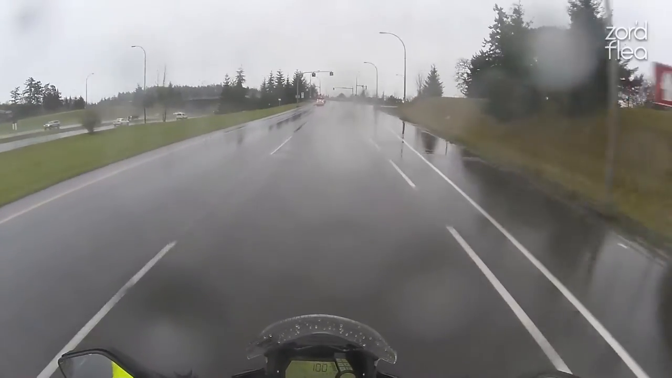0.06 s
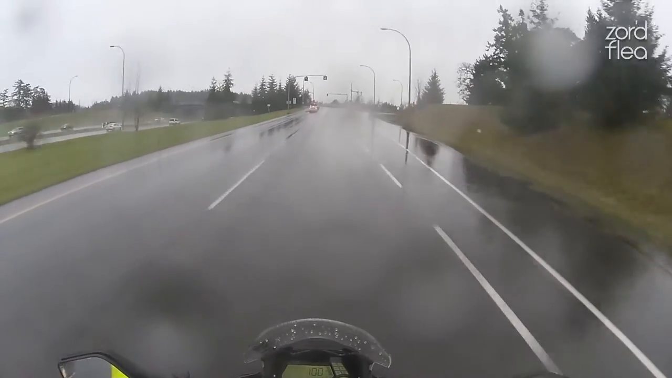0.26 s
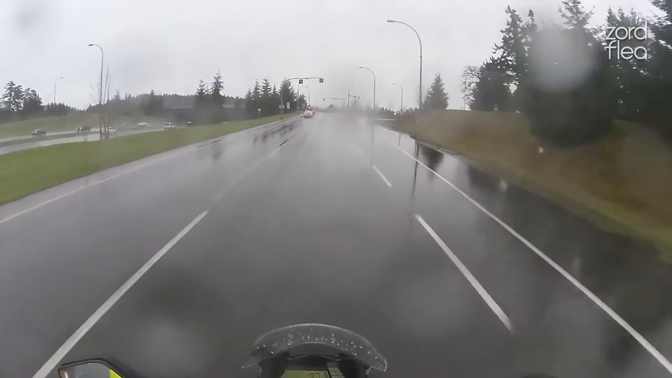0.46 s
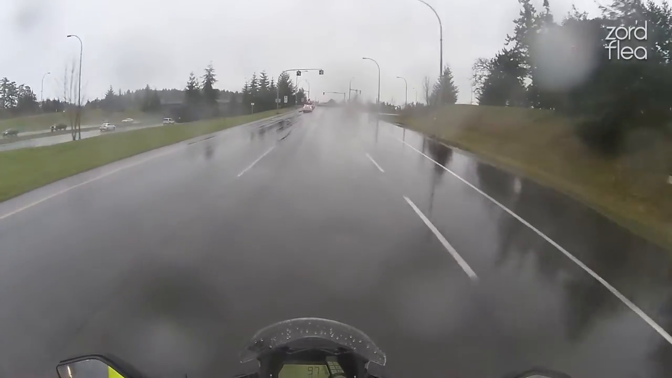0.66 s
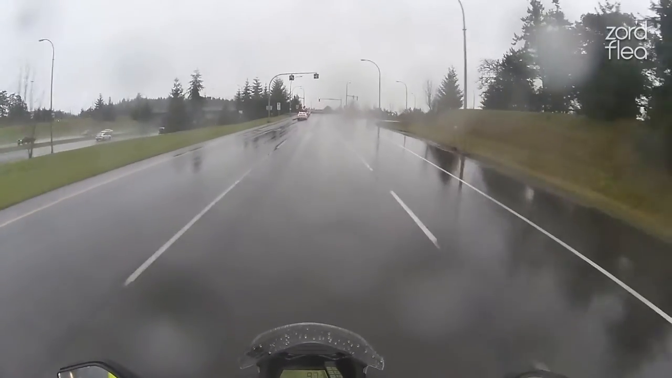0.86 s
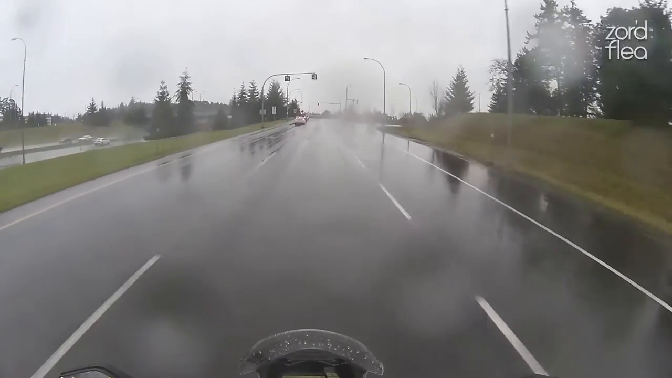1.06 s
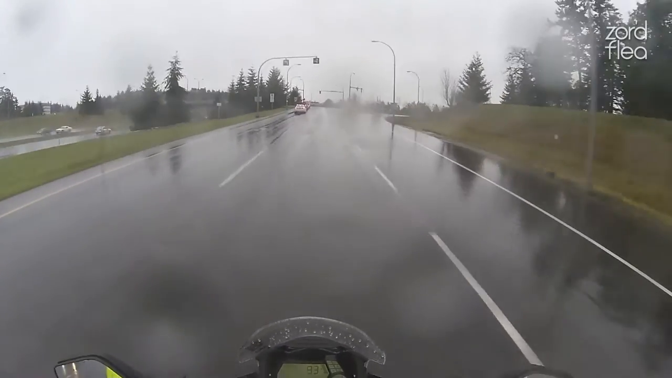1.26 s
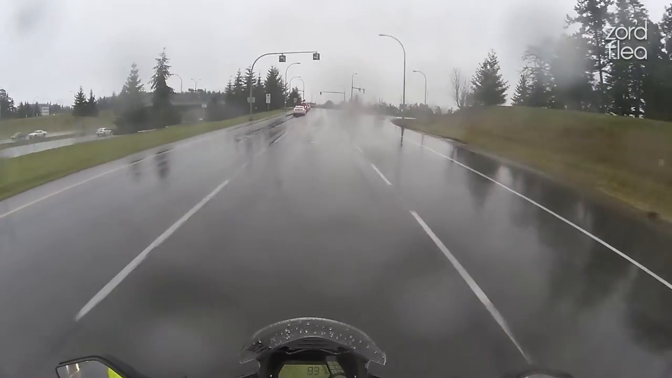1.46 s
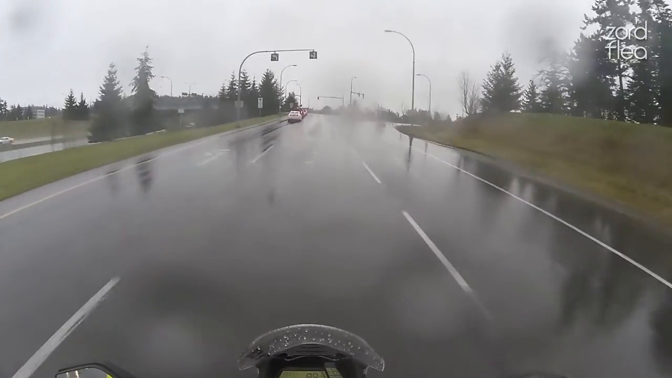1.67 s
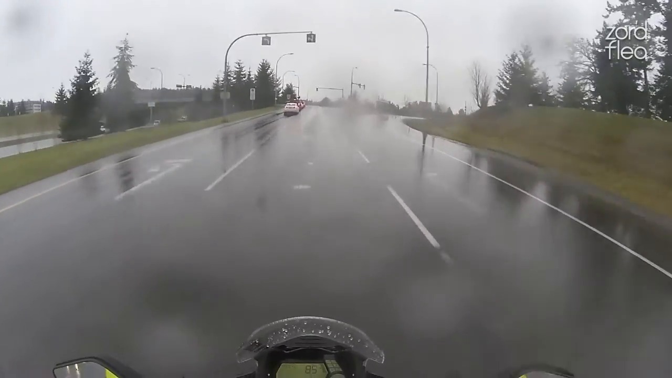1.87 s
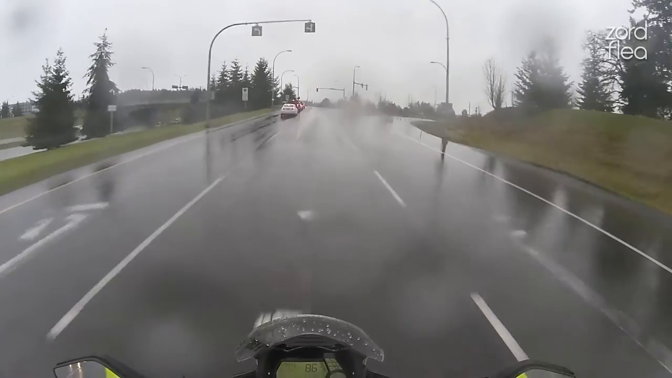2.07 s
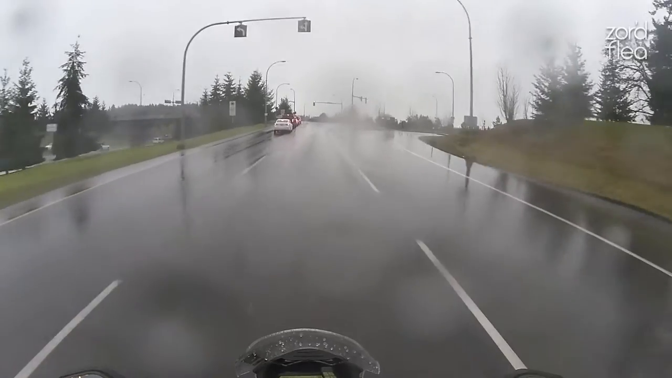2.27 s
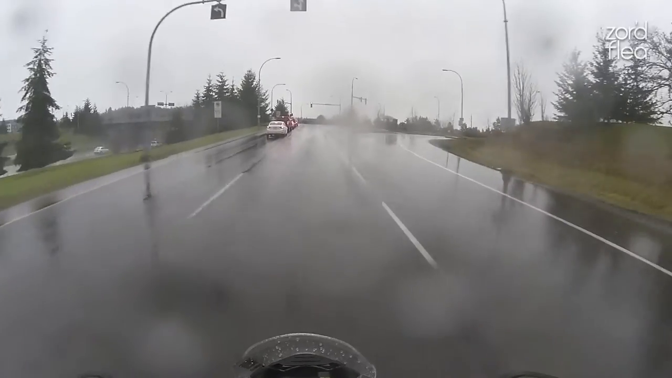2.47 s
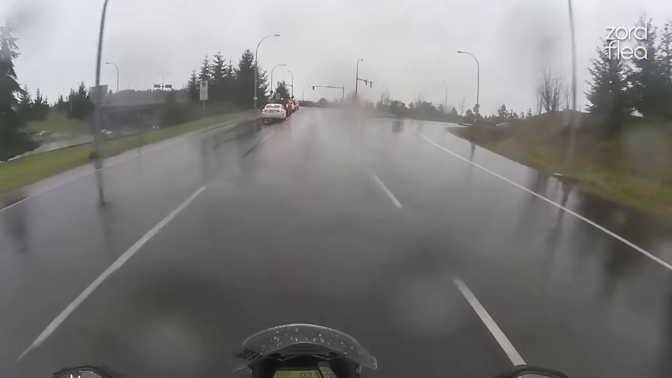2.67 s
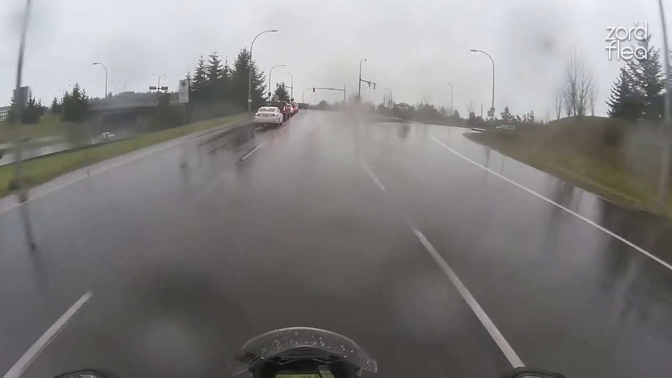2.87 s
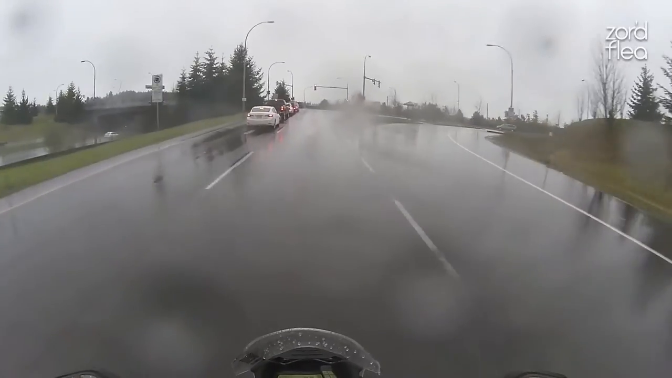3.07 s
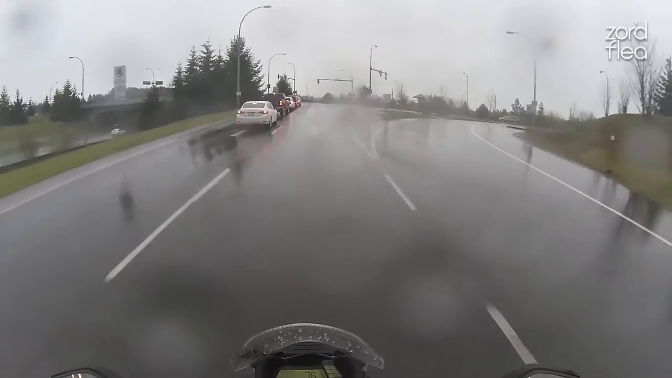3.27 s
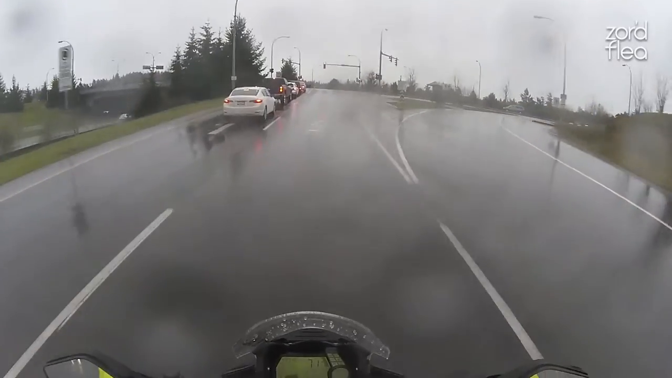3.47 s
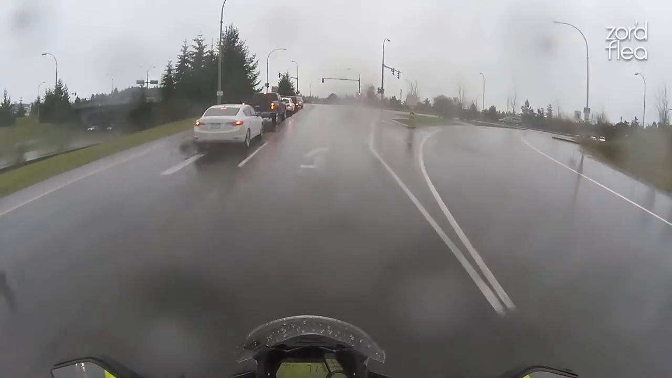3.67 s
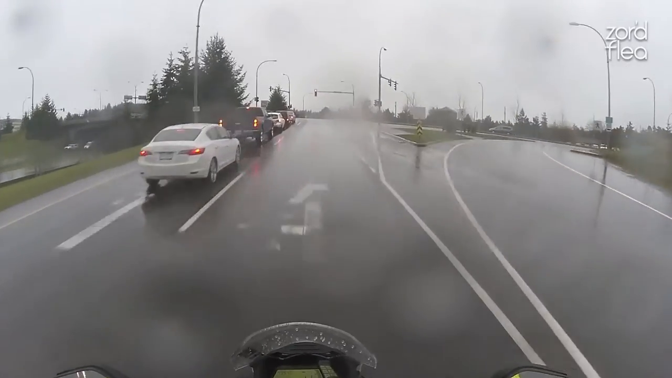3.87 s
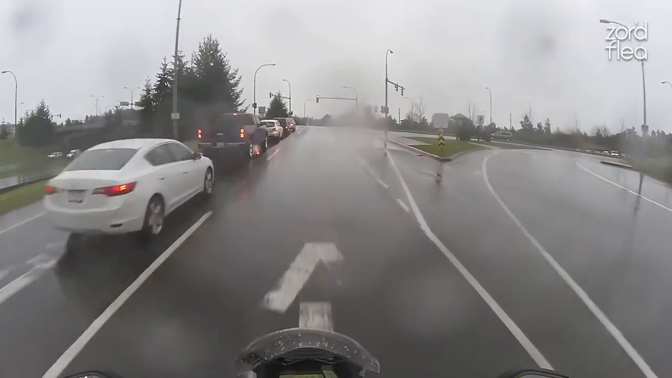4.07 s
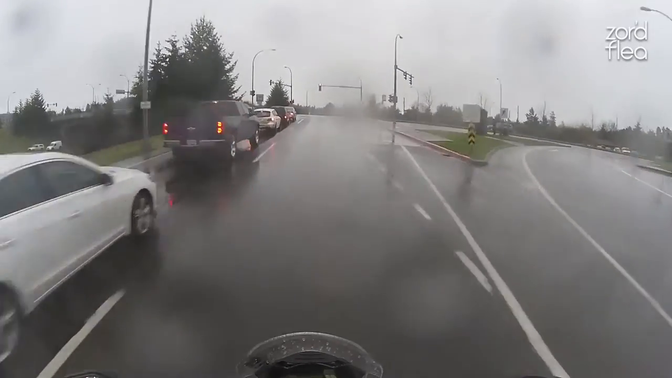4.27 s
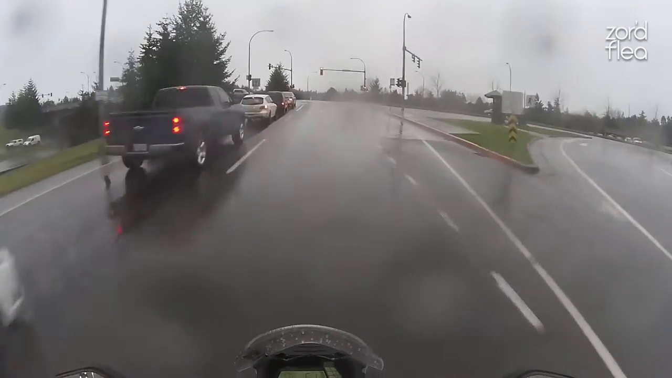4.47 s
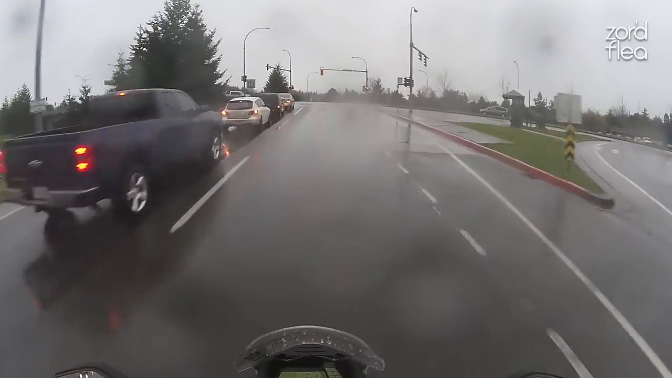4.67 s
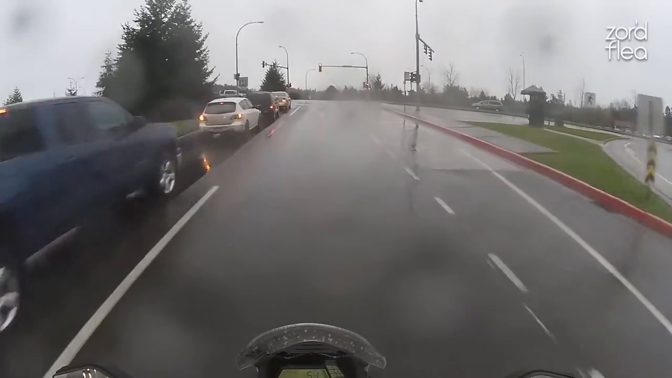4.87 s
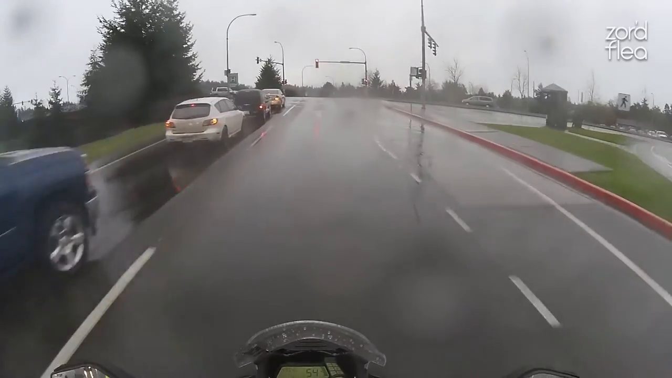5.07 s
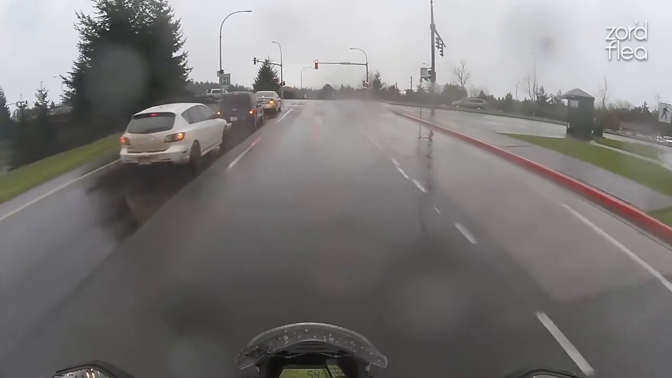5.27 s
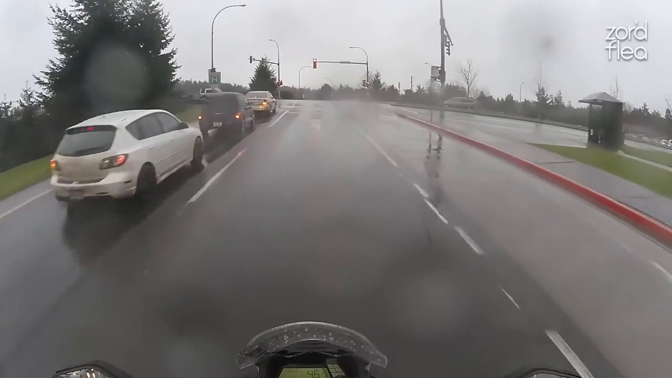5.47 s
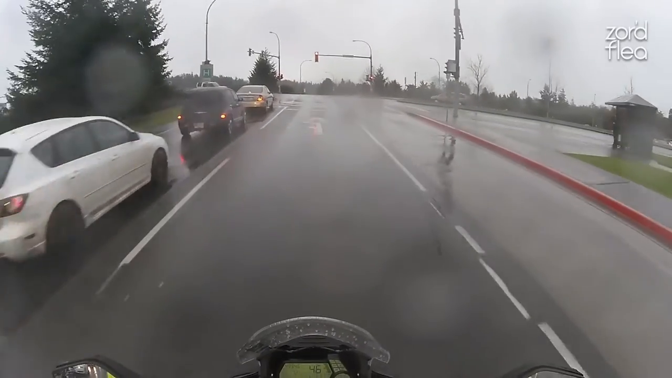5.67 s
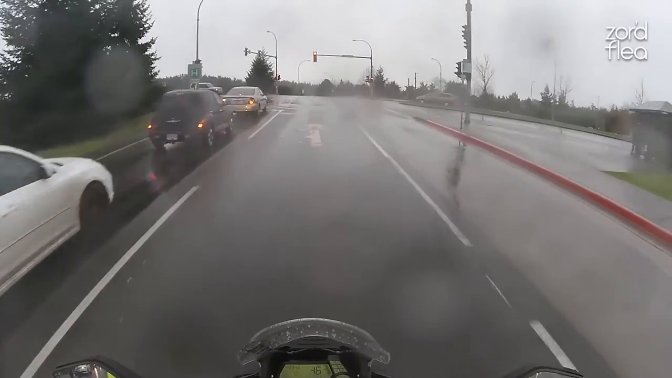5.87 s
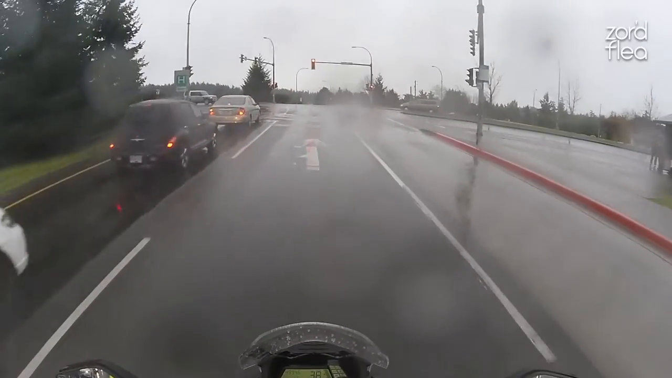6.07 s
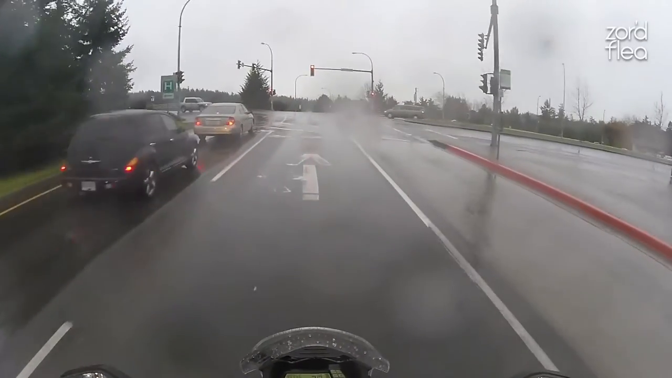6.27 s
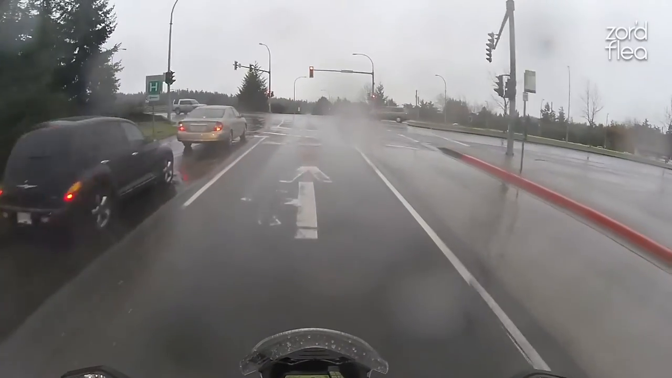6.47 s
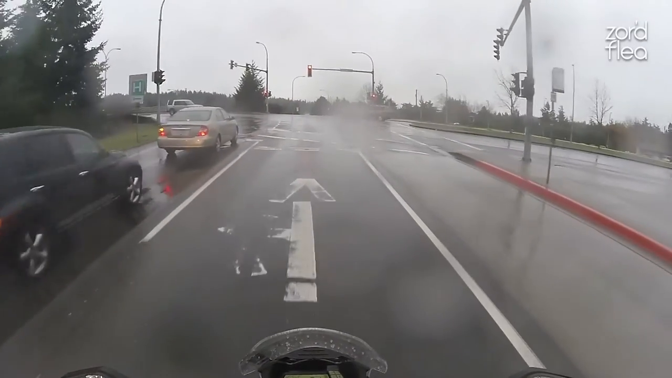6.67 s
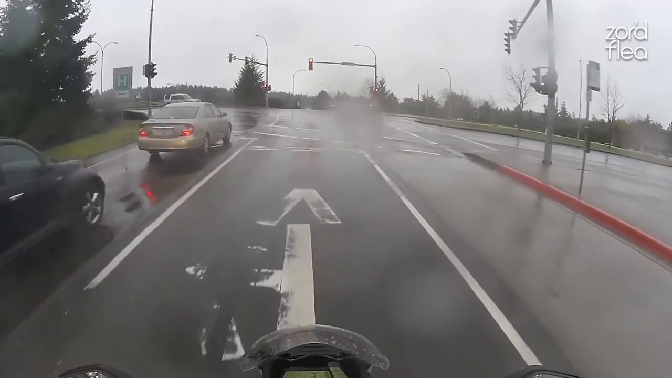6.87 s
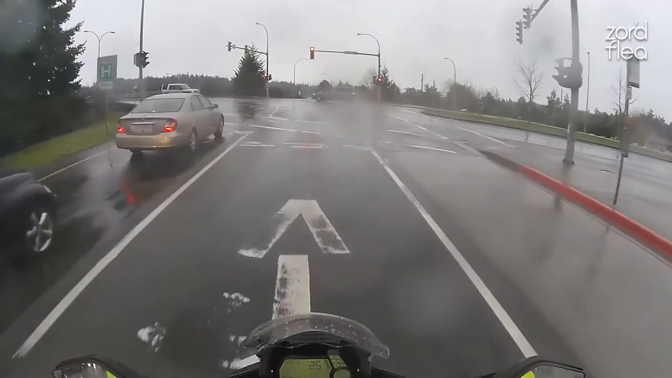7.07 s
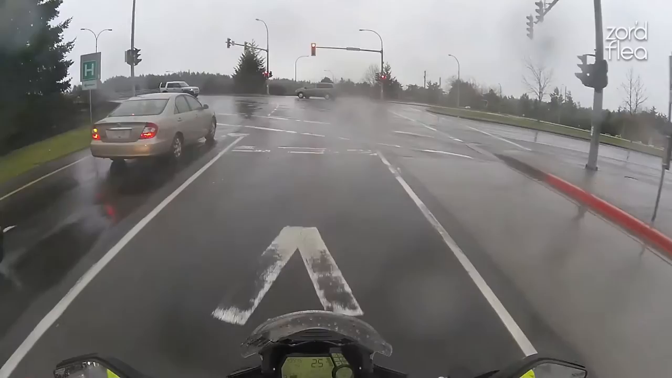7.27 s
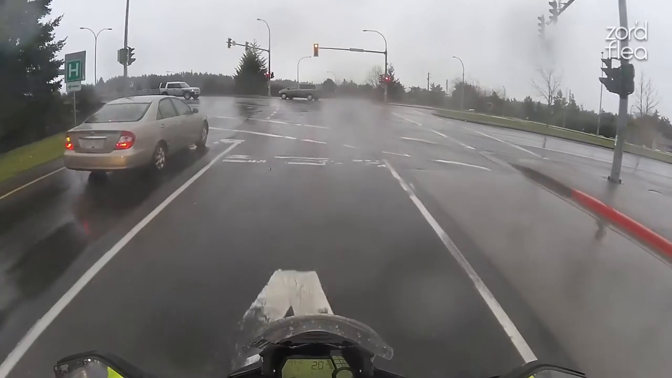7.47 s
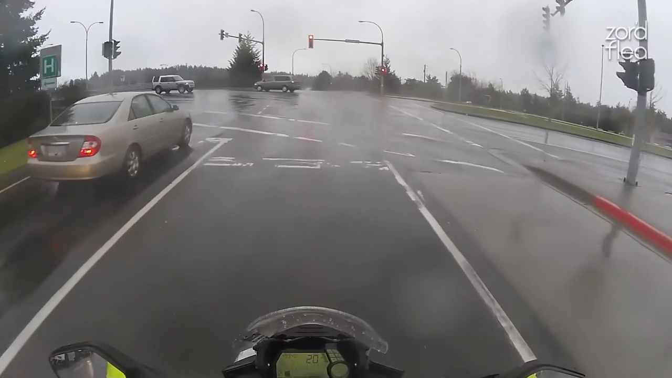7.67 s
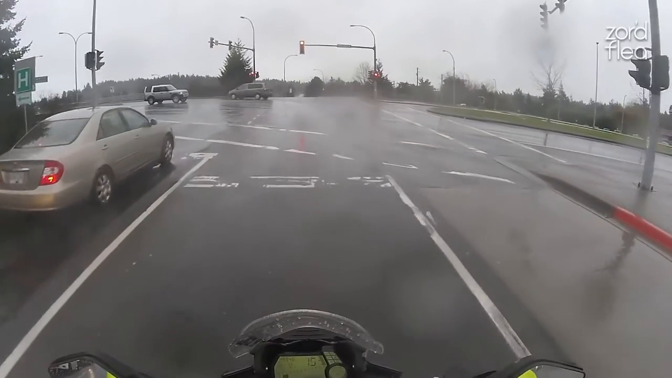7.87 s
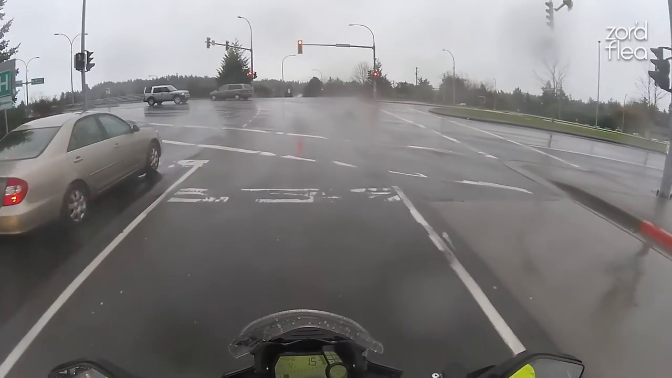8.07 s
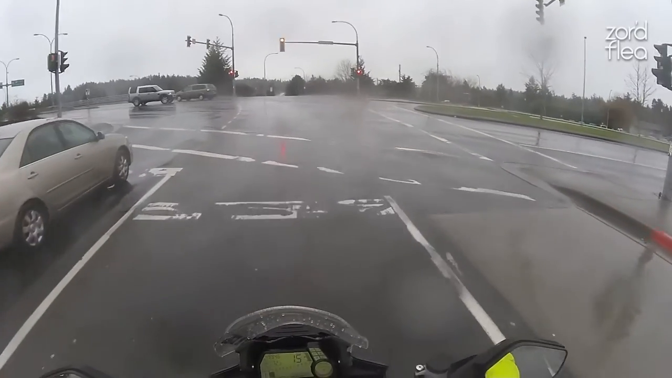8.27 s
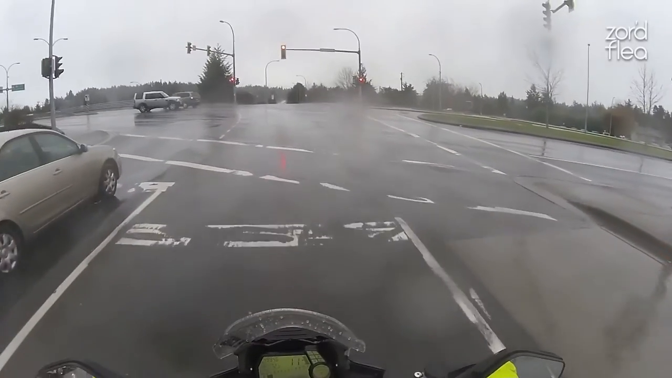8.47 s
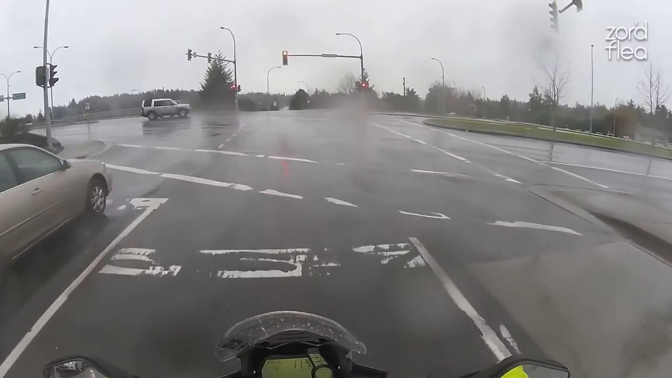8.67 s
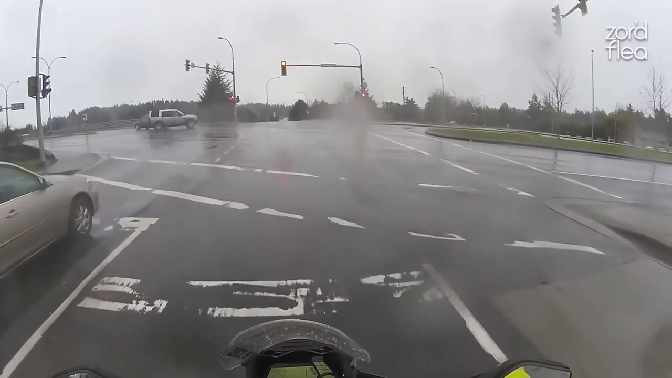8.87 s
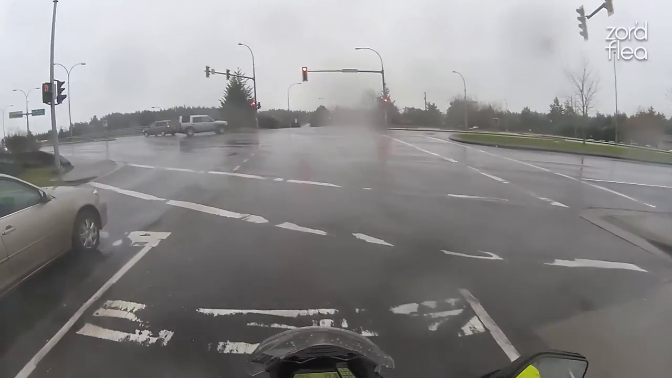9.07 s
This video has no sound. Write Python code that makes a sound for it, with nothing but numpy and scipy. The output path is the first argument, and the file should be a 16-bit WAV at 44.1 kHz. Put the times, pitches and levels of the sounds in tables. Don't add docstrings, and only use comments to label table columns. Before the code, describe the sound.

A motorcycle decelerates from highway speed in rain. Muffled wind roar and gust slaps dominate at first, over watery tyre hiss, drops tapping and gear whine. Light brake hiss and a brief rise of revs follow, then a falling engine drone. Once the clutch is pulled, lumpy exhaust pulses and metallic ticking come forward, then a gear clunk and slow idle, with a faint high electronic whistle close at the microphone.

```python
import sys
import numpy as np
from scipy import signal
from scipy.io import wavfile
from scipy.ndimage import uniform_filter1d

SR = 44100
rng = np.random.default_rng(int(sys.argv[2]) if len(sys.argv) > 2 else 0)


def unload_wav(signal):
    wavfile.write(
        sys.argv[1],
        SR,
        np.round(np.clip(np.atleast_2d(signal).T, -1, 1) * 32767).astype(np.int16),
    )


def gain_from_db(level_db):
    decades = np.asarray(level_db, float) / 20
    return 10 ** decades


N = 402191
TIME = np.arange(N) / SR

# t/s, road speed/(km/h), air speed at helmet/(km/h)
MOTION = [(0, 99, 102), (.4, 87.4, 71), (1.2, 79, 84.8), (2.2, 68, 72.7), (2.6, 61, 62.4), (3.1, 53.5, 48),
          (3.5, 63, 50.8), (4.2, 54.4, 39.3), (4.6, 47, 35.5), (5.2, 35, 26), (5.7, 27.8, 24.5),
          (6.4, 20.2, 19.2), (7.2, 8.6, 17), (9.12, 0.71, .6)]
# t/s, engine cycles/Hz
CRANK_SPEED = [(0, 33.2), (.4, 32.75), (1.0, 31.28), (2.0, 28.83), (3.05, 26), (3.5, 30), (4.0, 28.6),
               (4.4, 26.2), (5.0, 22), (6.0, 15.27), (6.2, 14.13), (6.45, 13.2), (9.2, 11.7)]

# f/Hz, density/dB
STREET_SPECTRUM = [(15, -0.5), (50, 0.5), (110, -2), (200, 13.5), (400, -1), (700, -8), (1300, -1),
                   (1720, -6.5), (1950, -14.5), (3200, -20), (5000, -29.5), (8000, -37.5), (12500, -45)]
WIND_SPECTRUM = [(18, -40), (30, -13.5), (91, 2), (140, 2), (250, -6), (640, -24), (781, -27.5), (838, -42),
                 (900, -51.5), (1170, -57.5), (1980, -120)]
RUSH_SPECTRUM = [(240, -17), (400, -3.5), (628, -7.5), (845, -6), (985, -7), (1080, -5.5), (1260, -7),
                 (1830, -16.5), (1990, -15), (2600, -25.5), (3050, -30), (3960, -45), (6710, -120)]
SPRAY_SPECTRUM = [(2000, -19), (2700, 0), (3200, -3), (4300, -4.5), (5000, -9), (6300, -14), (8000, -16),
                  (10000, -19.5), (11000, -27), (12000, -30.5), (13500, -40)]
RUMBLE_SPECTRUM = [(12, -20), (25, -6), (45, 0.5), (70, 0), (110, -22)]

# t/s, level/dB, length/s
GUSTS = [(0.27, 2, 0.037), (0.34, -4.5, 0.042), (0.45, 3.5, 0.2), (0.69, 1.5, 0.25), (0.78, 2, .05),
         (1.01, 5.5, 0.016), (1.05, -4, 0.038), (1.08, 9.5, 0.02), (1.12, -5.5, 0.081), (1.21, -1.5, 0.1),
         (1.79, 5, 0.041), (1.84, -4.5, 0.1), (1.92, 5, 0.049), (2.04, 0, 0.11), (2.21, 1, 0.12),
         (2.27, -3, 0.056), (2.41, 7.5, 0.02), (2.48, -4, 0.029), (2.95, 7.5, 0.058), (3.17, 4, 0.14),
         (3.6, -6, 0.05), (3.79, 5, 0.071), (3.83, -9, 0.066), (3.89, 3.5, 0.13), (4.05, 3.5, 0.13),
         (4.2, 4.5, 0.19), (4.5, -3, .1), (4.65, 3, 0.083), (5.3, 1.5, .1), (0.05, 1, .04),
         (0.13, -3, 0.12), (1.55, -1.5, .1)]
# t/s, peak level/dB, f/Hz
SLAPS = [(0.268, -5, 192), (0.769, 4, 166), (0.811, -30, 191), (1.443, -5.5, 161), (1.483, -1, 191),
         (2.184, -7, 151), (2.381, -24, 237), (2.631, -10, 205), (2.831, -7.5, 159), (4.062, -10.5, 244)]
# t/s, peak level/dB, f/Hz
EDDIES = [(0.174, -18, 242), (0.26, -14, 202), (0.349, -16, 275), (0.441, -13, 250), (0.769, -13, 205),
          (0.812, -11, 202), (1.013, -14, 223), (1.106, -23, 202), (1.229, -10, 245), (1.32, -14, 215),
          (1.445, -20, 226), (1.516, -20, 277), (1.561, -8, 202), (1.599, -6.5, 258), (1.744, -17, 202),
          (1.895, -13.5, 207), (2.074, -22, 248), (2.148, -17, 275), (2.194, -15, 264), (2.295, -19, 275),
          (2.337, -19, 221), (2.386, -10.5, 229), (2.482, -10, 229), (2.743, -23, 253), (2.816, -21, 283),
          (3.163, -15, 202), (3.218, -11.5, 312), (3.391, -29, 275), (3.413, -24, 285), (3.597, -26, 261),
          (3.688, -38, 366), (3.931, -25, 256), (3.993, -34, 202), (4.038, -30, 202), (4.064, -21, 234),
          (4.142, -29, 205), (4.438, -29, 202)]
# f/Hz, width/Hz, level/dB
HOLLOW = [(975, 49, -7), (1253, 42, -6), (1686, 37, -4.5), (1940, 35, -5.5), (2830, 63, -6.5),
          (4400, 330, -10.5)]
# t/s, level/dB, length/s
PUDDLES = [
    (2.7, 1, .3),
    (3.0, 0, 0.33),
    (3.5, 2, 0.26),
    (3.95, -1, 0.39),
    (4.4, 1, 0.39),
]
# t/s, peak level/dB
CLEAR_DROPS = [(0.0, -13), (0.05, -33), (0.4014, -43), (0.6712, -45), (0.7727, -43), (0.849, -39),
               (1.18, -50), (1.504, -49), (1.529, -38), (1.9111, -32), (1.9979, -43), (2.1041, -49),
               (2.2957, -54), (2.5421, -36), (2.7791, -43), (2.9639, -54), (3.0788, -53), (3.1562, -35),
               (3.845, -45), (3.8786, -53), (4.812, -35), (4.8942, -48)]
# t/s, peak level/dB
SPLATS = [(0.3601, -36), (0.3895, -36), (0.773, -36), (0.815, -47), (1.0557, -39), (1.1438, -37),
          (1.2511, -42), (1.9136, -39), (1.981, -38), (2.0128, -43), (2.187, -41), (2.7771, -40),
          (3.6591, -37), (3.9015, -49.5), (4.064, -44), (4.604, -43), (8.5016, -48)]
# t/s, level/dB, length/s
ROAD_PATCHES = [
    (2.6, 8, 1.0),
    (3.5, -5, 0.59),
    (4.2, 8.5, 1),
    (4.34, -12, 0.16),
    (4.0, 6, 0.11),
    (6.2, -2, .15),
]
# start t/s, swell/s, hold/s, fade/s, level/dB
SQUEEZES = [
    (2.6, 0.34, .25, .3, -63.5),
    (4.1, 0.27, .2, 0.55, -63.5),
    (4.7, 0.16, 0.38, 1.6, -68.5),
]

# start t/s, swell/s, hold/s, fade/s, level/dB
WHINES = [
    (0.0, .4, .75, 1.2, -35),
    (3.6, .5, 2.0, .25, -50),
]
# t/s, level/dB, length/s
WHINE_SURGES = [
    (.42, 2, .15),
    (.66, 3, .14),
    (.79, -5, .08),
    (1.0, 3, .3),
    (4.68, 3, .12),
    (4.97, 2, .1),
    (5.14, 2, .1),
]
# t/s, peak level/dB, f/Hz
TICKS = [(5.3136, -39, 1750), (5.4039, -39, 1890), (5.597, -47, 1940), (5.637, -52, 2030),
         (5.6868, -52, 1960), (5.9701, -49, 2020), (6.3054, -45, 1800), (6.3443, -51, 1940),
         (6.4371, -49, 1640), (6.5304, -47, 1650), (6.5533, -42, 1740), (6.6067, -51, 1970),
         (6.6925, -45, 1630), (6.7798, -50, 2070), (6.8641, -45, 2050), (6.9469, -52, 1680),
         (6.9714, -51, 1600), (7.0332, -46, 2040), (7.0547, -45, 1960), (7.1594, -53, 1930),
         (7.2253, -48, 1740), (7.3894, -46, 1630), (7.4742, -50, 1970), (7.7391, -52, 2030),
         (7.7675, -53, 1600), (7.9347, -53, 1630), (8.1577, -51, 1980), (8.2484, -47, 2070),
         (8.5014, -52, 2030), (8.5368, -51, 1620), (8.5902, -53, 1600), (8.7633, -50, 1600),
         (8.8481, -51, 1620), (8.8765, -51, 1930), (8.9294, -48, 1800), (8.9673, -51, 1810),
         (8.9997, -53, 1650), (9.0187, -52, 1640), (9.0392, -52, 1760), (9.102, -47, 1600)]
# f/Hz, width/Hz, level/dB
CASES = [(593, 100, -3), (775, 69, 4), (993, 89, 2), (1253, 50, 2), (1516, 70, 2), (1705, 54, 1),
         (1960, 100, -5), (2390, 200, -13), (2800, 126, -11.5), (3520, 78, -19), (3980, 250, -21.5),
         (4880, 200, -27)]
# place/cycle, length/cycle, level/dB
KNOCKS = [
    (.07, .2, -3),
    (.47, .07, 5),
    (.36, .08, -1),
    (.86, .1, 2.5),
]
# t/s, level/dB, length/s
LABOUR = [
    (7.12, 2, 0.53),
]
# f/Hz, width/Hz, level/dB
VALVE_RINGS = [(4100, 600, -16), (5600, 200, -10)]

# multiple of cycle rate, level/dB, loudest at f/Hz
SINGING = [(2, -38, 49), (5, -39, 108), (7, -45, 150), (11, -34, 252), (14, -38, 243), (16, -45, 372),
           (20, -48, 362)]
# f/Hz, width/Hz, level/dB
PIPE = [(90, 54, -7), (126, 23, -9.5), (274, 37, 0), (385, 90, -4)]
# f/Hz, width/Hz, share removed/1
CANCELS = [(176, 20, .5), (222, 14, .6), (392, 20, .5)]
# t/s, level/dB
OVERRUN = [
    (0, -20.5),
    (1.0, -28.5),
    (2.2, -31),
    (3.6, -30),
    (4.2, -47),
    (4.6, -29.5),
    (5.3, -39),
    (5.9, -35),
]
# t/s, firings so far/1
IDLE = [(5.998, 0), (6.339, 5), (6.646, 9), (6.9945, 13), (7.0405, 14), (7.125, 15), (7.264, 17),
        (7.518, 20), (7.787, 23), (7.867, 24), (8.207, 28), (8.374, 30), (8.464, 31), (8.808, 35),
        (9.057, 38)]
# firing number/1, level over the rest/dB
UPSETS = [
    (13, 3),
    (14, 6),
    (16, -8.5),
]
# t/s, peak level/dB
FULL_BURNS = [
    (6.315, -33),
    (6.791, -29.5),
    (7.0633, -31.5),
]

CRUISE_KMH = 80
WIND_DB, RUSH_DB, SPRAY_DB, RUMBLE_DB = -15, -32.5, -50.5, -36
WIND_EXPONENT, RUSH_EXPONENT, SPRAY_EXPONENT, RUMBLE_EXPONENT = 4.34, 3.14, 3.16, 0.79
STREET_DB, STREET_SHELTER_DB = -48.5, -5
DRONE_LIFT_S, CLUTCH_IN_S, CLUNK_S = 2.2, 5.81, 7.03
DRONE_DB, DRONE_DB_PER_HZ, DRONE_LIFT_DB = -37, 0.9, 11
SHARP_DB, SHARP_SCATTER_DB, DULL_DB, DULL_SCATTER_DB = -30, -1.3, -35.5, 4
FIRST_LEAD_CYCLES = .36
FIRING_DELAY_S = .0039
WHISTLE_HZ, FRAME_HZ, GAP_AT_S = 9625, 50, .0165


def unit(x):
    return x / np.sqrt(np.mean(x ** 2))


def noise():
    return rng.standard_normal(N)


def ring(x, hz, width_hz):
    return signal.lfilter(*signal.iirpeak(hz, hz / width_hz, fs=SR), x)


def ring_twice(x, hz, width_hz):
    return ring(ring(x, hz, width_hz), hz, width_hz)


def soften(x, hz):
    return signal.sosfilt(signal.butter(4, hz, fs=SR, output="sos"), x)


def clicks(times_s, sizes):
    out = np.zeros(N + 2)
    at = np.clip(times_s * SR, 0, N)
    np.add.at(out, at.astype(int), sizes * (1 - at % 1))
    np.add.at(out, at.astype(int) + 1, sizes * (at % 1))
    return out[:N]


def push(x, length_s):
    bell = np.hanning(int(length_s * SR) + 3)
    return signal.fftconvolve(x, bell / bell.sum(), "same")


def curves(table):
    s, *columns = np.transpose(table)
    return [np.interp(TIME, s, column) for column in columns]


def bumps(rows):
    return sum(db * np.exp(-(2 * (TIME - at) / length) ** 2) for at, db, length in rows)


def swells(rows, depth_db):
    levels = []
    for at, up, hold, down, db in rows:
        corners = np.cumsum([at, up, hold, down])
        levels.append(db + np.interp(TIME, corners, [-depth_db, 0, 0, -depth_db], -90, -90))
    return np.max(levels, axis=0)


def speed_db(cruise_db, exponent, speed):
    return cruise_db + exponent * 10 * np.log10(speed)


def gusty(spectrum, all_db, own_db, frames):
    hz, _, cells = signal.stft(noise(), SR, nperseg=1024, noverlap=832)
    f, db = np.transpose(spectrum)
    colour = np.interp(np.log(hz + 1), np.log(f), db, -120, -120)
    chance = rng.standard_normal((25, cells.shape[1]))
    chance = uniform_filter1d(uniform_filter1d(chance, frames), frames)
    chance /= chance.std()
    band = np.clip(2.4 * np.log2(1 + hz / 20), 0, 23).astype(int)
    gain_db = colour[:, None] + all_db * chance[24] + own_db * chance[band]
    return unit(signal.istft(cells * gain_from_db(gain_db), SR, nperseg=1024, noverlap=832)[1][:N])


def cancel(x):
    return x - sum(share * ring(x, hz, width) for hz, width, share in CANCELS)


def hollow(x):
    return x + sum(gain_from_db(db) * ring(x, hz, width) for hz, width, db in HOLLOW)


def street(road):
    return gain_from_db(STREET_DB + STREET_SHELTER_DB * road) * cancel(gusty(STREET_SPECTRUM, .6, .4, frames=3))


def dents(rows, delay_s, trim_db, cycles):
    out, span = np.zeros(N), np.arange(-800, 800)
    for at, peak_db, hz in rows:
        phase = span / SR * hz
        dent = np.cos(2 * np.pi * phase) * np.exp(-(phase / cycles) ** 2)
        out[int((at + delay_s) * SR) + span] += gain_from_db(peak_db + trim_db) * dent
    return out


def slaps():
    return dents(SLAPS, .005, -1.0, cycles=.42)


def eddies():
    return dents(EDDIES, .004, -3.5, cycles=.89)


def wind(breeze, gust_db):
    level_db = speed_db(WIND_DB, WIND_EXPONENT, breeze) + gust_db
    return gain_from_db(level_db) * gusty(WIND_SPECTRUM, 1.3, 1.3, frames=3)


def tyre_rush(road, gust_db):
    level_db = speed_db(RUSH_DB, RUSH_EXPONENT, road) + 0.049 * gust_db
    return gain_from_db(level_db) * hollow(gusty(RUSH_SPECTRUM, 1.0, .34, frames=3))


def spray(spray_db):
    return gain_from_db(spray_db) * hollow(gusty(SPRAY_SPECTRUM, 1.5, -1.0, frames=2))


def drops(spray_db):
    clear, fat = np.array(CLEAR_DROPS), np.array(SPLATS)
    chance = rng.random((700, 2)).T
    small_s = chance[0] * N / SR
    small = gain_from_db(np.interp(small_s, TIME, spray_db) + 1.0 - 2.4 * np.log(chance[1]))
    hits = clicks(np.r_[clear[:, 0] + .0005, small_s], np.r_[gain_from_db(clear[:, 1] + 8.0), small])
    splats = clicks(fat[:, 0] + .00062, gain_from_db(fat[:, 1] + 29.5))
    bright = soften(ring(ring(hits, 5100, 8000), 5500, 9000), 12000)
    return bright + soften(ring_twice(splats, 2850, 1100), 5000)


def road_rumble(road):
    level_db = speed_db(RUMBLE_DB, RUMBLE_EXPONENT, road) + bumps(ROAD_PATCHES)
    return gain_from_db(level_db) * gusty(RUMBLE_SPECTRUM, -6.0, 1.5, frames=9)


def brakes():
    rub = noise()
    hiss = .8 * ring_twice(rub, 7330, 500) + .6 * ring_twice(rub, 8300, 300)
    hiss += .6 * ring_twice(rub, 6300, 1200)
    return gain_from_db(swells(SQUEEZES, depth_db=18.5)) * unit(hiss)


def shafts(turns, speed):
    waver = unit(uniform_filter1d(noise(), size=2500))
    lift_db = DRONE_LIFT_DB * np.clip((TIME - DRONE_LIFT_S) / .57 + .5, 0, 1)
    lift_db -= 70 * np.clip(TIME - CLUTCH_IN_S, 0, 1)
    drone_db = DRONE_DB + DRONE_DB_PER_HZ * (speed - 30) + lift_db + 2.1 * np.roll(waver, N // 2)
    whine_db = swells(WHINES, depth_db=12) + bumps(WHINE_SURGES) - 1 + 1.5 * waver
    whine = gain_from_db(whine_db) * np.sin(2 * np.pi * 31 * turns + .3 * waver)
    return gain_from_db(drone_db) * np.sin(2 * np.pi * 3 * turns) + whine


def clunk():
    since = np.clip(TIME - CLUNK_S, -1e-9, 1)
    rattle = unit(ring_twice(noise(), 1400, 1000)) * np.exp(-since / .009) * (since >= 0)
    knock = ring(push(clicks(np.array([CLUNK_S + .012]), np.array([-1.])), .0015), 480, 220)
    return gain_from_db(8) * knock + soften(gain_from_db(-41) * rattle, 2200)


def ticks():
    out, span = np.zeros(N), np.arange(600) / SR
    for at, peak_db, hz in TICKS:
        start = int((at + .00054) * SR)
        metal = np.sin(2 * np.pi * hz * span) * np.exp(-span / .002)
        out[start:start + len(span)] += gain_from_db(peak_db + 1.0) * metal
    return out


def cases():
    s, count = np.transpose(IDLE)
    place = np.interp(TIME, np.r_[s, 10], np.r_[count, count[-1] + 11]) % 1
    power = .12
    for at, share, db in KNOCKS:
        distance = (place - at + .5) % 1 - .5
        power = power + gain_from_db(2 * db) * np.exp(-(distance / share) ** 2 * 2)
    clatter = np.sqrt(power) * noise()
    metal = sum((-1) ** k * gain_from_db(db) * ring(clatter, hz, width) for k, (hz, width, db) in enumerate(CASES))
    idling = np.clip((TIME - CLUTCH_IN_S) / .5, 0, 1)
    return gain_from_db(-56.5 + bumps(LABOUR)) * idling * unit(metal)


def valves(firings_s):
    seats = clicks(firings_s - .016, gain_from_db(-23 + 2.7 * rng.standard_normal(len(firings_s))))
    return sum(gain_from_db(db) * ring_twice(seats, hz, width) for hz, width, db in VALVE_RINGS)


def tappets(firings_s):
    between_s = firings_s[:-1] + .46 * np.diff(firings_s)
    taps = clicks(between_s, gain_from_db(2.2 * rng.standard_normal(len(between_s))))
    return gain_from_db(-17) * push(taps, .015) * unit(ring_twice(noise(), 2020, 740))


def header(turns, speed):
    driven = np.clip((CLUTCH_IN_S + .08 - TIME) / .091, 0, 1)
    out = np.zeros(N)
    for k, db, hz in SINGING:
        nearness = np.exp(-((k * speed / hz - 1) / .09) ** 2 / 2)
        out += gain_from_db(db) * nearness * np.sin(2 * np.pi * k * turns)
    return driven * out


def idle():
    s, count = np.transpose(IDLE)
    number = np.arange(count[-1] + 1)
    chance = rng.standard_normal((len(number), 2)).T
    upset_db = sum(db * (number == k) for k, db in UPSETS)
    sharp_db = SHARP_DB + SHARP_SCATTER_DB * chance[0] + upset_db
    return np.c_[np.interp(number, count, s), sharp_db, DULL_DB + DULL_SCATTER_DB * chance[1]]


def blow(fires, drop_s, build, lead_s, build_s):
    return build * np.roll(push(fires, build_s), -int(lead_s * SR)) - push(fires, drop_s)


def exhaust(turns):
    beats, full = idle(), np.array(FULL_BURNS)
    firings_s = beats[:, 0]
    cycles = np.arange(1, turns[int(firings_s[0] * SR)] - .5)
    rolling_s = np.interp(np.c_[cycles - FIRST_LEAD_CYCLES, cycles].ravel(), turns, TIME)
    chance = rng.standard_normal((len(rolling_s), 2)).T
    overrun_db = np.interp(rolling_s, TIME, curves(OVERRUN)[0]) + .9 * chance[1]
    overrun = clicks(rolling_s + .0001 * chance[0], gain_from_db(overrun_db))
    sharp = clicks(np.r_[firings_s, full[:, 0]] + FIRING_DELAY_S, gain_from_db(np.r_[beats[:, 1], full[:, 1]]))
    half_s = firings_s[1:] + FIRING_DELAY_S - FIRST_LEAD_CYCLES * np.diff(firings_s)
    half = clicks(half_s, gain_from_db(beats[1:, 2]))
    hot = blow(sharp, .0044, 1.3, .0022, .01) + .16 * blow(half, .004, 3, .004, .0072)
    cool = .58 * blow(overrun, .004, .77, .0043, .0082)
    pipe = np.zeros(N)
    for hz, width, db in PIPE:
        pipe += gain_from_db(db) * (ring(hot, hz, width) + ring(cool, .979 * hz, 1.46 * width))
    echo = np.r_[np.zeros(int(.0166 * SR)), pipe][:N]
    muffled = soften(cancel(pipe + .27 * echo), 1500)
    gas = push(overrun + sharp + half, .013) * unit(ring(noise(), 1300, 1200))
    engine = gain_from_db(58) * muffled + soften(gain_from_db(20) * gas, 1900)
    return engine + tappets(firings_s) + valves(firings_s)


def scene():
    speed = curves(CRANK_SPEED)[0]
    turns = np.cumsum(speed) / SR
    road, breeze = (np.clip(c, .1, None) / CRUISE_KMH for c in curves(MOTION))
    gust_db = bumps(GUSTS)
    spray_db = speed_db(SPRAY_DB, SPRAY_EXPONENT, road) + .083 * gust_db + bumps(PUDDLES)
    air = wind(breeze, gust_db) + slaps() + eddies()
    water = tyre_rush(road, gust_db) + spray(spray_db) + drops(spray_db)
    chassis = road_rumble(road) + brakes()
    bike = shafts(turns, speed) + clunk() + ticks() + cases() + header(turns, speed) + exhaust(turns)
    return (street(road) + air + water + chassis + bike)[None]


def top_cut(x):
    return signal.sosfilt(signal.butter(12, 15500, fs=SR, output="sos"), x)


def record(dry):
    place = ((TIME - GAP_AT_S) * FRAME_HZ + .5) % 1 - .5
    gate = np.clip((abs(place) - .04) / .03, 0, 1)
    whistle = gain_from_db(-70.5) * gate * np.sin(2 * np.pi * WHISTLE_HZ * TIME)
    pushed = dry + .25 * (dry ** 2 - uniform_filter1d(dry ** 2, size=2000))
    pushed = signal.sosfilt(signal.butter(2, 18, "high", fs=SR, output="sos"), pushed)
    rounded = np.tanh(0.53 * pushed) / 0.63
    return top_cut(soften(rounded, 14000) + whistle)


dry = scene()
out = record(dry)
unload_wav(out)
```